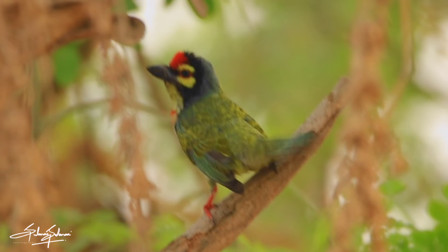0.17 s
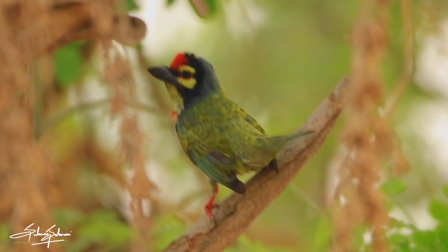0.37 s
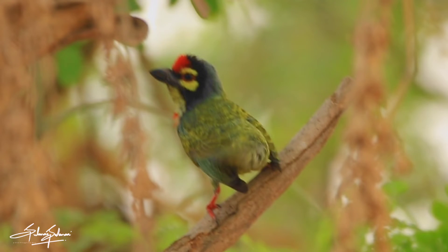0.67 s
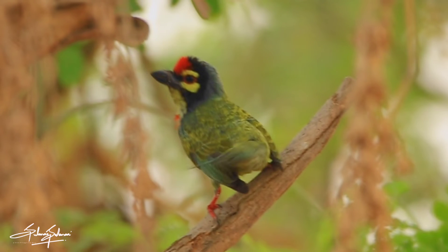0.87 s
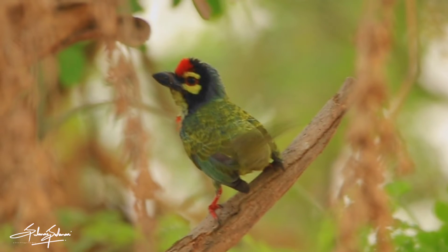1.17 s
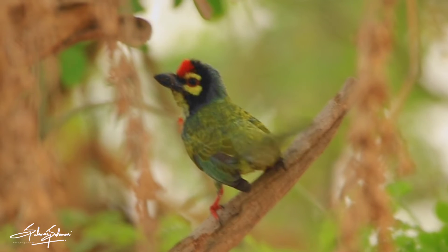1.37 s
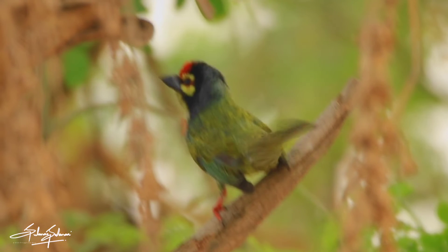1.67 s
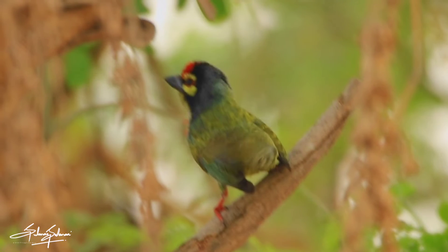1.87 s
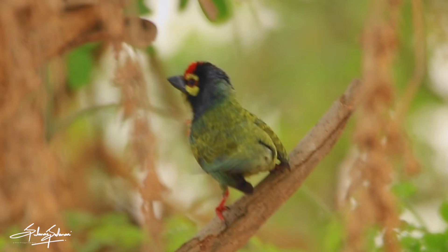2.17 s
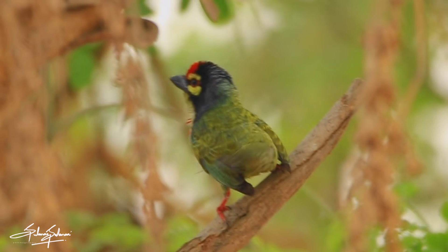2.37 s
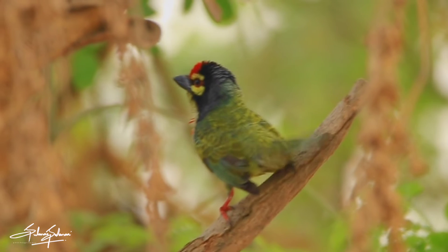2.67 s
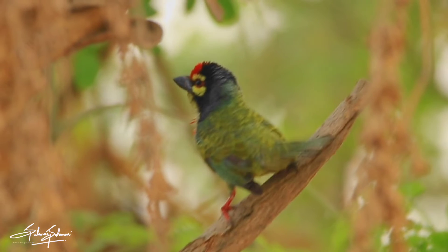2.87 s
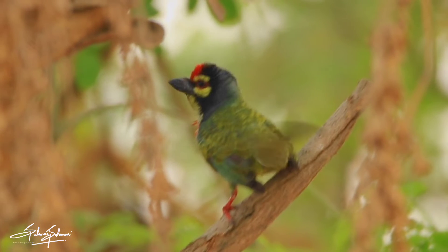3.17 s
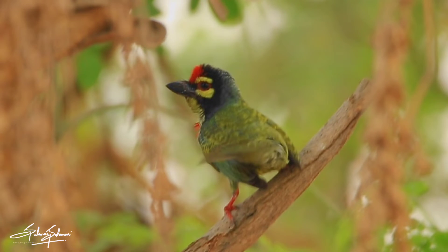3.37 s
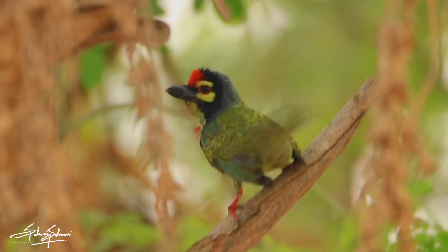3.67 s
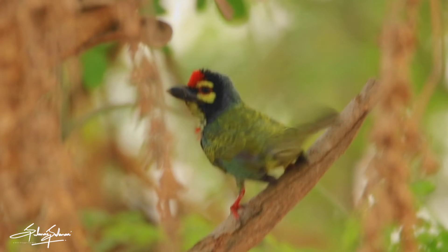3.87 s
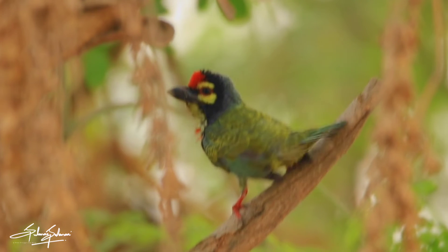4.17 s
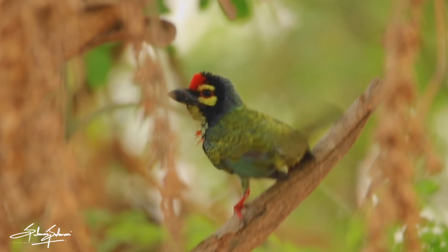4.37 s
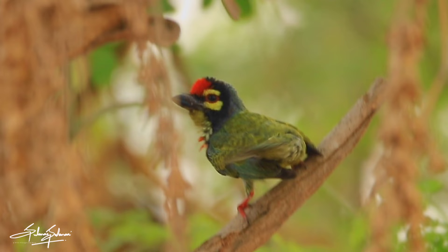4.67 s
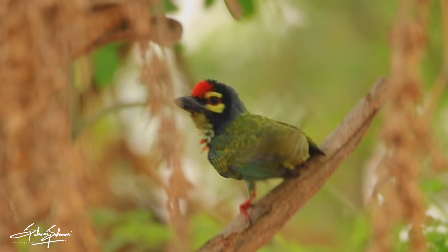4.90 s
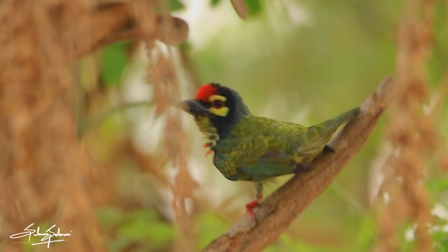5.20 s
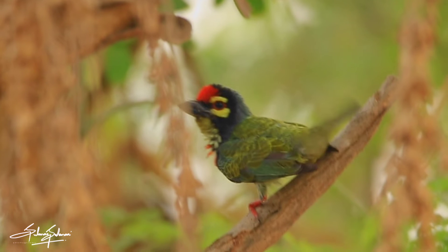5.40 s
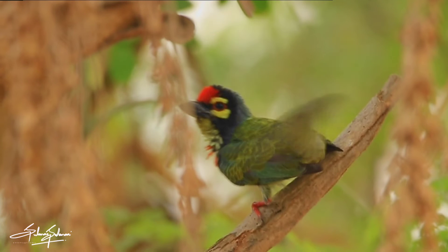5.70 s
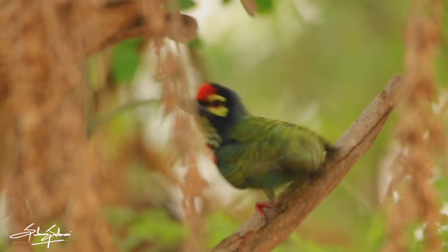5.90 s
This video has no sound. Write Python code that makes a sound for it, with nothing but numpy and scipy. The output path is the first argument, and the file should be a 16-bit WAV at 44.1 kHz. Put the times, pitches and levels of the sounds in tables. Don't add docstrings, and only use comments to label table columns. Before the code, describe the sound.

A barbet repeats low, hollow tuk notes about twice a second while small birds chirp and whistle around it over soft outdoor rumble.

```python
import sys
import numpy as np
from scipy import signal
from scipy.fft import next_fast_len
from scipy.io import wavfile
from scipy.ndimage import uniform_filter1d

SR = 44100
rng = np.random.default_rng(int(sys.argv[2]) if len(sys.argv) > 2 else 0)


def boost(x):
    u = np.asarray(x, float) / 20
    return 10 ** u


def waveform_to_disk(signal):
    frames = np.transpose(np.atleast_2d(signal))
    scaled = np.clip(frames, -1, 1) * 32767
    samples = np.round(scaled).astype(np.int16)
    wavfile.write(sys.argv[1], SR, samples)


N = 266452
T = np.arange(N) / SR


def rms_one(x):
    return x / np.sqrt(np.mean(x ** 2) + 1e-20)


def panned(x, pan_db):
    return x * boost(np.minimum([[pan_db], [-pan_db]], 0))


def at_hz(points, hz):
    table_hz, values = np.transpose(points)
    return np.interp(np.log(hz), np.log(table_hz), values)


def drift(rate):
    r = np.exp(-2 * np.pi * rate / SR)
    noise = rng.standard_normal(N + SR)
    return rms_one(signal.lfilter([1], [1, -2 * r, r * r], noise)[SR:])


def add(out, start_s, x):
    i = round(start_s * SR)
    a, b = max(i, 0), min(i + x.shape[1], N)
    out[:, a:b] += x[:, a - i:b - i]


def widened(mid, side, alike):
    alike = np.clip(alike, 0, 1)
    return np.sqrt(1 + alike) * mid + np.sqrt(1 - alike) * side * [[1], [-1]]


def hump(t, middle_s, rise_s, fall_s):
    away = t - middle_s
    return np.exp(-np.where(away < 0, away / rise_s, away / fall_s) ** 2)


def blips(table, trill, wobble, sharp, trill_hz=58):
    out, t = np.zeros((2, N)), np.arange(-.2 * SR, .3 * SR) / SR
    slip, phase = drift(23), wobble * drift(53)
    chances = rng.random((len(table), 2))
    for (s, db, hz, rise_s, fall_s, pan_db), (turn, pick) in zip(table, chances):
        away = np.abs(np.where(t < 0, t / rise_s, 2 * t / fall_s / sharp))
        level = np.exp(-away ** np.where(t < 0, 2, sharp))
        first = int(pick * N / 2)
        own = slice(first, first + len(t))
        throb = 1 - trill * np.sin(np.pi * trill_hz * t + slip[own] * np.tanh(t / 0.011)) ** 2
        tone = throb * np.sin(2 * np.pi * (hz * t + turn) + phase[own])
        add(out, s + t[0], panned(boost(db) * level * tone, pan_db))
    return out


# [t/s of the peak, level/dB, f/Hz, fade/dB per ms, rounding of the top/s]
TUK_NOTES = [(-.085, -14, 712, .5, .01), (.481, -12.5, 712.8, 0.23, 0.0046), (1.043, -12, 714, 0.48, 0.019),
             (1.6, -11, 711.5, 0.43, 0.004), (2.166, -17.5, 701.7, 0.72, 0.01),
             (2.748, -14, 700.4, 0.46, 0.0019), (3.326, -12, 703.2, 0.7, 0.0082),
             (3.898, -13, 705.7, 0.5, 0.0026), (4.447, -11, 702, 0.9, 0.0078),
             (5.007, -14.5, 697.4, 1.1, 0.0048), (5.585, -6.9, 704.7, .497, 0.0014)]
# [trunk level/dB, wall delay t/s, wall level/dB, wall smear/s, far house level/dB]
RETURNS = [(-50, 0.1, -42.5, 0.022, -52), (-50, 0.2, -45, 0.008, -45), (-41.5, 0.1, -48, 0.012, -49),
           (-24, .116, -31.5, 0.011, -49), (-26, .118, -31, 0.023, -46.5), (-24, 0.109, -29, 0.022, -47.5),
           (-21.5, 0.117, -28, 0.03, -50), (-23.5, .128, -31, 0.026, -42), (-28, .111, -27.5, 0.016, -48.5),
           (-33, 0.131, -38, 0.039, -50.5), (-36, .114, -28, 0.009, -46.5)]
FACING = [.3, 0.78, .4, 0.91, 0.79, -0.17, -0.73, -1.2, -.2, -0.71, 0.39]
OPEN_S, CLOSE_S = 0.044, .008
TRUNK_S, TRUNK_SMEAR_S, TRUNK_TURN = .047, .0075, 2.3


def tuks(rise_s=0.0105, scoop_hz=40, scoop_s=0.0092, lead_db=-35, lead_s=0.023):
    out, t = np.zeros((2, N)), np.arange(-.06 * SR, .12 * SR) / SR
    lead = boost(lead_db) * np.exp(-((t + lead_s) / 0.015) ** 2)
    trunk_swell = hump(t, TRUNK_S, TRUNK_SMEAR_S, TRUNK_SMEAR_S)
    rising = (np.minimum(t, 0) / rise_s) ** 2
    closing = (np.maximum(t - OPEN_S, 0) / CLOSE_S) ** 2
    beak = np.exp(-rising - closing)
    for (s, db, hz, fade, round_s), (trunk_db, *_), pan_db in zip(TUK_NOTES, RETURNS, FACING):
        fading = boost(-1000 * fade * (np.hypot(np.maximum(t, 0), round_s) - round_s))
        pitch = hz + scoop_hz * np.exp(-np.maximum(t + rise_s, 0) / scoop_s)
        phase = 2 * np.pi * np.cumsum(pitch) / SR
        note = beak * fading * np.sin(phase) + lead * np.cos(phase)
        trunk = boost(trunk_db - db) * trunk_swell * np.sin(phase + TRUNK_TURN)
        add(out, s + t[0], panned(boost(db) * (note + trunk), pan_db))
    return out


# [t/s of the middle, level/dB, f/Hz, swell/s]
STRAYS = [(3.64, -48.5, 700, 0.045), (4.475, -20.5, 697, 0.011), (1.106, -35.5, 693, 0.0071),
          (5.032, -26.5, 700, 0.017), (5.075, -36.5, 670, 0.028), (5.558, -38, 655, 0.008),
          (5.631, -21, 730, 0.0039), (5.64, -20, 699, 0.0085), (5.663, -27, 783, 0.013),
          (5.725, -37, 669, 0.0082), (5.77, -46, 694, 0.023)]
# [t/s of the middle, level/dB, f/Hz, swell/s]
MORE_STRAYS = [
    (2.147, -30, 732, 0.0032),
    (3.56, -53, 700, 0.053),
    (3.879, -30, 735, 0.0045),
    (4.512, -33.5, 705, .007),
    (4.598, -36.5, 706, 0.017),
    (5.215, -45.5, 681, 0.038),
]
# [hedge level/dB, back wall level/dB]
HEDGE_AND_BACK_WALL = [(-56, -51), (-47, -50), (-52, -57), (-46.5, -44), (-43.5, -34.5), (-30, -35),
                       (-32, -30.5), (-36.5, -31.5), (-40.5, -40.5), (-41, -43), (-39, -49)]
HEDGE_S, BACK_WALL_S, HOUSE_S = .08, .16, .275
BACK_WALL_SMEAR_S, HOUSE_SMEAR_S = 0.012, 0.015
HAZE_S, HAZE_LOSS_DB, HAZE_FALL_S = .068, 16, .07
RETURN_SAG_HZ, RETURN_SHAKE = 4, .25


def echoes():
    rows = [(s, db, hz, swell_s, swell_s, .8) for s, db, hz, swell_s in STRAYS]
    rows += [(s, db, hz, swell_s, swell_s, -2.5) for s, db, hz, swell_s in MORE_STRAYS]
    out = blips(rows, trill=0.027, wobble=0.44, sharp=2.3)
    t = np.arange(round(.45 * SR)) / SR
    pans = 3 * rng.standard_normal((len(TUK_NOTES), 2))
    shake = RETURN_SHAKE * drift(41)
    notes = zip(TUK_NOTES, RETURNS, HEDGE_AND_BACK_WALL, pans)
    for k, ((s, _, hz, *_), returned, (hedge_db, back_db), pan) in enumerate(notes):
        _, wall_s, wall_db, smear_s, house_db = returned
        phase = 2 * np.pi * (hz - RETURN_SAG_HZ) * t + shake[k * len(t):(k + 1) * len(t)]
        haze = panned(boost(wall_db - HAZE_LOSS_DB) * hump(t, HAZE_S, 0.0088, HAZE_FALL_S), pan[0])
        hedge = panned(boost(hedge_db) * hump(t, HEDGE_S, .017, 0.011), .5 * pan[1])
        wall = panned(boost(wall_db) * hump(t, wall_s, smear_s, 1.1 * smear_s), .7)
        back_swell = hump(t, BACK_WALL_S, 0.37 * BACK_WALL_SMEAR_S, 1.8 * BACK_WALL_SMEAR_S)
        behind = panned(boost(back_db) * back_swell, pan[1])
        house = panned(boost(house_db) * hump(t, HOUSE_S, HOUSE_SMEAR_S, HOUSE_SMEAR_S), -.4)
        in_step = np.sin(phase) * (haze + hedge + wall + house)
        add(out, s, in_step + np.sin(phase + TRUNK_TURN) * behind)
    return out


# [t/s, f/Hz, level/dB]
ANSWERING_NOTE = [
    (5.58972, 759.5, -40),
    (5.598, 759.5, -20.8),
    (5.604, 853.4, -15.6),
    (5.61, 837.1, -14.7),
    (5.616, 783.3, -7.8),
    (5.622, 812.3, -8.5),
    (5.626, 750, -8.2),
    (5.63, 750, -18.2),
    (5.64, 750, -40),
]


def neighbour():
    s, hz, db = np.transpose(ANSWERING_NOTE)
    level = uniform_filter1d(boost(np.interp(T, s, db, left=-200, right=-200)), size=132)
    pitch = np.interp(T, s, hz) * (T > s[0])
    return panned(level * np.sin(2 * np.pi * np.cumsum(pitch) / SR), 0.66)


# [t/s of the peak, level/dB, f/Hz, fall/s]
CHIRPS_AHEAD = [(.152, -40, 1953, 0.068), (.316, -43.5, 3360, 0.013), (.455, -49, 3420, 0.028),
                (.484, -24.5, 3421, 0.029), (.498, -22, 3404, 0.011), (.522, -42, 2800, 0.07),
                (.53, -31.5, 3435, 0.037), (.57, -40, 3400, 0.031), (.6, -45, 3450, .02),
                (.515, -56.5, 6200, 0.028), (.535, -53, 5750, 0.013), (.535, -41.5, 6130, 0.016),
                (.621, -35, 3430, 0.012), (.746, -36, 3336, 0.037), (.959, -48, 2216, 0.037),
                (1.085, -61.5, 6900, .027), (1.188, -34.5, 3200, 0.037), (1.185, -39.5, 2594, 0.066),
                (1.883, -37, 2937, 0.049), (.135, -72.5, 9150, 0.045), (.991, -64.5, 8970, .02),
                (2.109, -66, 8760, .015), (2.39, -69.5, 5870, 0.072), (3.3, -58.5, 5270, .06),
                (4.64, -57, 3270, .08), (5.055, -55, 3400, 0.02), (5.085, -56.5, 3400, .02),
                (5.68, -63.5, 6230, 0.027)]
# [t/s, level/dB, f/Hz, fall/s]
CHIRPS_LEFT = [(.366, -60, 8700, 0.04), (.368, -39.5, 7240, 0.0037), (.508, -35.5, 2500, .012),
               (.55, -39, 2300, 0.019), (.795, -37, 2402, 0.028), (1.84, -36.5, 2245, .04),
               (.53, -27.5, 2480, 0.014), (.77, -34.5, 2447, 0.042), (.984, -37, 2147, 0.052),
               (1.487, -41, 3350, 0.021), (1.805, -32, 2244, 0.077)]
# [t/s, level/dB, f/Hz, fall/s]
CHIRPS_RIGHT = [
    (.276, -43.5, 5800, 0.027),
    (.3, -47, 5890, 0.065),
    (.619, -49.5, 6230, 0.012),
    (.991, -42, 3070, .017),
    (1.087, -38, 5510, 0.0084),
    (1.706, -52, 4200, 0.045),
    (2.107, -52, 3760, 0.021),
    (4.335, -41, 2615, 0.027),
]
# [t/s, level/dB, f/Hz, fall/s]
SLOW_RISERS = [
    (1.46, -51.5, 3400, 0.011),
    (1.7, -53.5, 3000, 0.016),
    (4.752, -43.5, 3320, 0.021),
    (4.93, -56.5, 3370, 0.092),
    (1.95, -49, 2930, 0.028),
]


def chirps():
    # calls, rise as a share of the fall, left-right dB
    perches = [(CHIRPS_AHEAD, 0.36, 2.2), (CHIRPS_LEFT, 0.36, 16), (CHIRPS_RIGHT, .3, -17), (SLOW_RISERS, 2, 8)]
    rows = []
    for calls, rise, pan_db in perches:
        rows += [(s, db, hz, rise * fall_s, fall_s, pan_db) for s, db, hz, fall_s in calls]
    return blips(rows, trill=.72, wobble=.7, sharp=1.4)


# [t/s of the middle, level/dB, f/Hz, swell/s]
TWIG_CREAKS = [
    (.086, -46, 3600, .005),
    (.094, -37, 2530, .005),
    (.1, -44.5, 3620, .003),
]
# [t/s of the middle, level/dB, f/Hz]
TRILL_PULSES = [(1.224, -40, 2770), (1.243, -35.5, 2910), (1.261, -33, 2886), (1.28, -30, 2915),
                (1.299, -29, 2863), (1.316, -28.5, 2792), (1.334, -30.5, 2840), (1.355, -39.5, 2780),
                (1.372, -44.5, 3030), (1.391, -49.5, 2766), (1.409, -53, 2740)]
TRILL_PULSE_S = 0.0066


def pulses():
    rows = [(s, db, hz, swell_s, 1.2 * swell_s, -3.0) for s, db, hz, swell_s in TWIG_CREAKS]
    rows += [(s, db, hz, TRILL_PULSE_S, 1.25 * TRILL_PULSE_S, 8.0) for s, db, hz in TRILL_PULSES]
    return blips(rows, trill=.1, wobble=.35, sharp=1.8)


def whistles(notes, pan_db):
    out = np.zeros(N)
    for note in notes:
        s, hz, db = np.transpose(note)
        level = uniform_filter1d(boost(np.interp(T, s, db, left=-200, right=-200)), size=132)
        out += level * np.sin(2 * np.pi * np.cumsum(np.interp(T, s, hz)) / SR)
    flutter = boost(4 * np.tanh(drift(66)))
    return panned(out * flutter, pan_db)


HOOK_S, HOOK_DB = 0.011, -8
GLIDE_S, GLIDE_ENDS = .062, 0.84
TAIL_DB, UPTURN_HZ = -5, 170


def falling(s, length_s, top_hz, bottom_hz, db):
    top, low, end = s + HOOK_S, s + min(GLIDE_S, GLIDE_ENDS * length_s), s + length_s
    span_hz, glide_s = top_hz - bottom_hz, low - top
    last_hz = bottom_hz + UPTURN_HZ
    return [(s, top_hz - .75 * span_hz, db - 20),
            (s + 0.3 * HOOK_S, top_hz - 0.23 * span_hz, db + HOOK_DB),
            (top, top_hz, db + HOOK_DB),
            (top + 0.27 * glide_s, top_hz - .1 * span_hz, db - 3.5),
            (top + 0.74 * glide_s, bottom_hz + 0.22 * span_hz, db),
            (low, bottom_hz + 10, db - 1.5),
            ((low + end) / 2, bottom_hz, db + TAIL_DB),
            (end - .004, last_hz, db + TAIL_DB),
            (end, last_hz, db - 26.5)]


# [start t/s, length/s, top f/Hz, bottom f/Hz, level/dB]
FALLING_NOTES = [
    (4.1, 0.106, 6655, 5974, -39.5),
    (4.412, 0.084, 6760, 6060, -35),
    (4.622, 0.083, 6700, 6035, -34.5),
    (4.956, 0.043, 6310, 5895, -38),
]


def four_whistles():
    return whistles([falling(*note) for note in FALLING_NOTES], pan_db=-4.5)


# [t/s, f/Hz, level/dB]
CHIRP_PATH = [
    (1.046, 3750, -52.5),
    (1.056, 3640, -42.5),
    (1.07, 3420, -35),
    (1.085, 3250, -40),
    (1.11, 3470, -55.5),
    (1.155, 3410, -57.5),
]


def falling_chirp():
    return boost(-7.5) * whistles([CHIRP_PATH], pan_db=2.0)


def struck(hits, modes, soft_s):
    out = np.zeros((2, N))
    at = [round((s - soft_s / 2) * SR) for s, *_ in hits]
    _, hit_db, bright = np.transpose(hits)
    n = np.arange(round(soft_s * SR) + 1)
    for hz, width, db, pan_db in modes:
        strike = np.full(N, 1e-18)
        chance_db = 1.2 * rng.standard_normal(len(at))
        strike[at] = boost(hit_db + bright * np.log2(hz / 2000) + db + chance_db)
        r, w = np.exp(-np.pi * width / SR), 2 * np.pi * hz / SR
        onset = np.hanning(len(n) + 2)[1:-1] * np.cos(w * n)
        ring = signal.lfilter([0, np.sin(w)], [1, -2 * r * np.cos(w), r * r], strike)
        out += panned(np.convolve(ring, 4 * onset / len(n))[:N], pan_db)
    return out


# [t/s, level/dB, brightness/dB per octave]
THROAT_PULSES = [(3.176, -29, -1.5), (3.183, -21.5, -2), (3.19, -15.5, -0.5), (3.196, -25.5, 0),
                 (3.2025, -10.5, -0.5), (3.207, -20.5, -0.5), (3.2128, -12, -1.5), (3.2238, -13, 0.5),
                 (3.232, -31.5, 2), (3.243, -39, 9), (3.251, -34, 11), (3.265, -31.5, 3.5),
                 (3.277, -35, 8.5), (3.283, -40, -2.5), (3.292, -42, 7.5), (3.302, -46.5, 9.5)]
# [f/Hz, width/Hz, level/dB, left-right level/dB]
THROAT_RINGS = [(281, 8, -41, 2.5), (700, 10, -42.5, 1.5), (1322, 41, -1.5, -23), (1375, 70, -0.5, -17.5),
                (1617, 76, -9.5, -20.5), (2298, 23, -21, -14.5), (4183, 107, -16.5, -18),
                (4940, 130, -18.5, 1.5), (5140, 73, -27, -8), (6200, 110, -36.5, 4)]


def croak():
    return struck(THROAT_PULSES, THROAT_RINGS, soft_s=0.0067)


# [t/s, level/dB, brightness/dB per octave]
TWIG_CRACKS = [(.09, -53, 6), (.097, -52, 8), (.104, -28, -8), (.108, -26, -6.5), (.1105, -27, -2),
               (.1125, -16, 2), (.116, -22.5, -4), (.127, -50, -5), (.14, -41, -9), (.152, -39.5, -8),
               (.167, -43, -10)]
# [f/Hz, width/Hz, level/dB, left-right level/dB]
TWIG_RINGS = [(1977, 16, -18.5, 12), (2550, 93, -0.5, -7.5), (3598, 110, -2.5, -3), (5250, 110, -11, 2.5),
              (5660, 240, -9.5, -16), (6500, 270, -19, -9), (7120, 240, -8, 14), (7660, 200, -10, 5)]


def snapping_twig():
    return struck(TWIG_CRACKS, TWIG_RINGS, soft_s=0.0038)


# [t/s, level/dB, left-right level/dB]
TICK_TIMES = [
    (0.113, -35, -5),
    (0.303, -50.5, -6),
    (.368, -48.5, 2.5),
    (.535, -50, 0),
    (0.622, -67.5, 8.5),
    (.992, -61, 12.5),
    (1.086, -63.5, 4.5),
    (1.705, -70, -5),
    (2.112, -64.5, 8),
    (4.221, -48, 7),
]


def ticks(length_s=0.0025):
    out, t = np.zeros((2, N)), np.arange(-300, 600) / SR
    bright = signal.butter(3, [4000, 9000], "band", fs=SR, output="sos")
    for s, db, pan_db in TICK_TIMES:
        noise = signal.sosfilt(bright, rng.standard_normal(len(t)))
        add(out, s + t[0], panned(noise * boost(db) * np.exp(-np.abs(t) / length_s), pan_db))
    return out


# [t/s of the middle, level/dB, f/Hz, swell/s]
FAR_BIRDS = [
    (2.73, -63, 5320, .05),
    (3.62, -66.5, 4800, 0.053),
    (3.95, -66, 5170, 0.036),
    (5.71, -66, 6680, .06),
]


def distant():
    rows = [(s, db, hz, swell_s, 1.5 * swell_s, 2.5) for s, db, hz, swell_s in FAR_BIRDS]
    return blips(rows, trill=.6, wobble=2.2, sharp=1.8)


def trees(x, t60, alike, first_s=0.031):
    t = np.arange(SR) / SR
    mid, side = rng.standard_normal((2, SR)) * boost(-60 * t / t60) * (t > first_s)
    tail = widened(mid, side, alike)
    return signal.fftconvolve(x, tail / np.sqrt(np.sum(tail ** 2) / 2), axes=1)[:, :N]


# [f/Hz, level/dB per Hz]
FLOOR_COLOUR = [(25, -31), (45, -12.5), (78, -9), (165, -16.5), (200, -17.5), (310, -2.5), (450, -5),
                (1300, -5.5), (2000, -13.5), (3500, -19), (4100, -32), (6800, -31), (7900, -54),
                (10000, -55), (15000, -64.5)]
# [t/s, level/dB]
FLOOR_LEVEL = [(0.0, -55), (1.24, -55.5), (1.6, -56), (4.17, -56.5), (4.84, -54.5), (5.32, -56),
               (6.04, -54.5)]
# [f/Hz, likeness 0-1]
FLOOR_LIKENESS = [(30, .93), (300, 0.91), (1000, 0.89), (2500, 0.71), (5000, 0.3), (7500, .0)]


def floor(patchy_db=3.0):
    out, together = 0, drift(1.5)
    edges = 22 * 2 ** (np.arange(30) / 3)
    white, flickers = rng.standard_normal((2, 2, N)), drift(11.0)
    for k, (low, high) in enumerate(zip(edges, edges[1:])):
        band = signal.butter(2, [low, high], "band", fs=SR, output="sos")
        mid, side = signal.sosfilt(band, white[k % 2])
        hz = np.sqrt(low * high)
        flicker = 0.099 * together + np.roll(flickers, k * SR // 5)
        gain = boost(at_hz(FLOOR_COLOUR, hz) + patchy_db * flicker)
        out = out + gain * widened(mid, side, at_hz(FLOOR_LIKENESS, hz))
    return rms_one(out) * boost(3.0 + np.interp(T, *np.transpose(FLOOR_LEVEL)))


def hum():
    pitch = 77 + 5.6 * drift(4.9)
    return boost(-73.5 + 1.8 * drift(1.9)) * np.sin(2 * np.pi * np.cumsum(pitch) / SR)


def scene():
    barbet = tuks() + echoes() + neighbour()
    barbet_far = boost(-24) * trees(barbet, t60=.6, alike=0, first_s=.02)

    drop = falling_chirp()
    drop_tail = boost(0.5) * trees(drop, t60=.15, alike=0.48, first_s=0.0015)
    small = chirps() + pulses() + distant() + drop + drop_tail
    dull_small = signal.lfilter([.45], [1, -.55], small)
    small_tail = boost(-13.0) * trees(dull_small, t60=0.76, alike=0.9)

    whistle = four_whistles()
    heard = 1 - 0.89 * ((T > 4.222) & (T < 4.40)) - 0.96 * np.clip((T - 5.125) / 0.051, 0, 1)
    whistle_tail = boost(-2.5) * heard * trees(whistle, t60=0.5, alike=0.3, first_s=0.0044)

    throat = croak()
    throat_tail = boost(-14) * trees(throat, t60=0.3, alike=0.32, first_s=0.0064)
    twig = snapping_twig()
    dull_twig = signal.lfilter([.4], [1, -.6], twig)
    twig_tail = boost(-12) * trees(dull_twig, t60=.22, alike=.7, first_s=.004)

    birds = barbet + barbet_far + small + small_tail + whistle + whistle_tail
    return birds + throat + throat_tail + twig + twig_tail + ticks() + floor() + hum()


def roll_off(x):
    return signal.sosfilt(signal.butter(12, 14500, fs=SR, output="sos"), x)


# [shift f/Hz, level/dB]
TOP_COPIES = [
    (3900, -38.5),
    (7800, -51),
]


def record(dry):
    bright = signal.butter(6, [4600, 7400], "band", fs=SR, output="sos")
    band = signal.hilbert(signal.sosfilt(bright, dry), next_fast_len(N))[:, :N]
    loudness = uniform_filter1d(np.abs(band).mean(0), size=2048)
    threshold = boost(-57.5 + 1.7 * drift(19))
    blanked = 1 / (1 + (threshold / loudness) ** 4)
    faint_band = signal.butter(5, [7050, 10500], "band", fs=SR, output="sos")
    faint = signal.sosfiltfilt(faint_band, dry)
    top = 0
    for hz, db in TOP_COPIES:
        shift = np.exp(2j * np.pi * hz * T + [[0], [1.3j]])
        top = top + boost(db) * np.real(band * shift)
    top = top * boost(4 * np.tanh(drift(150)))
    return roll_off(dry - blanked * faint + top)


dry = scene()
out = record(dry)
waveform_to_disk(out)
```